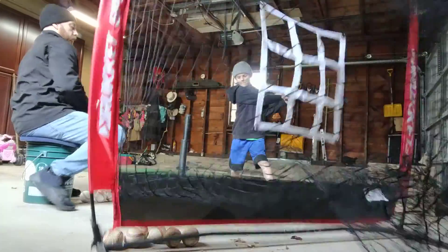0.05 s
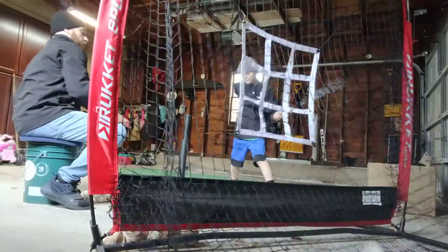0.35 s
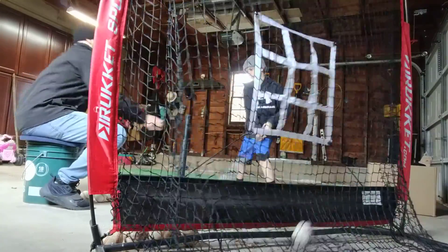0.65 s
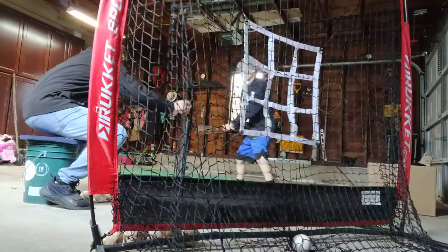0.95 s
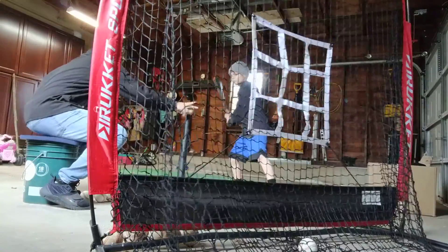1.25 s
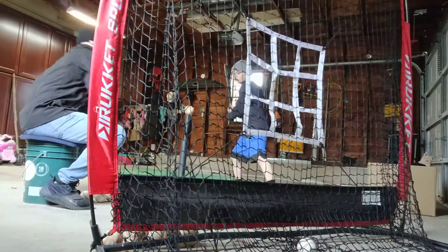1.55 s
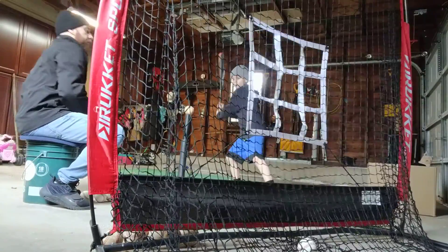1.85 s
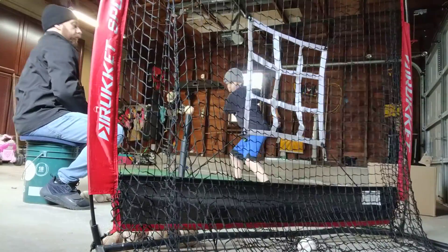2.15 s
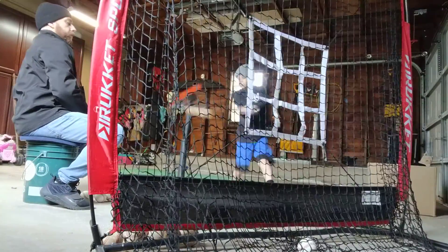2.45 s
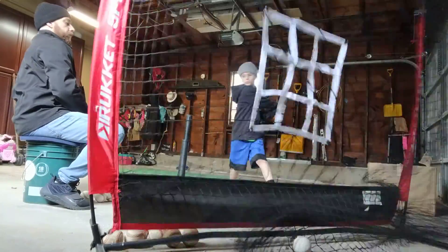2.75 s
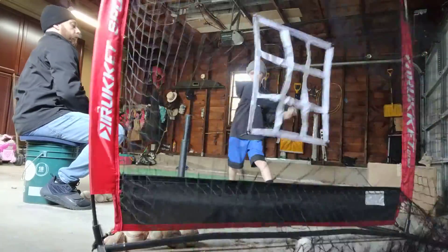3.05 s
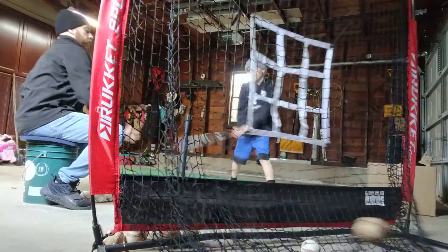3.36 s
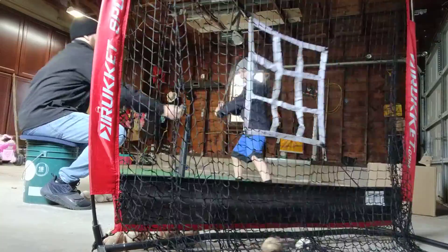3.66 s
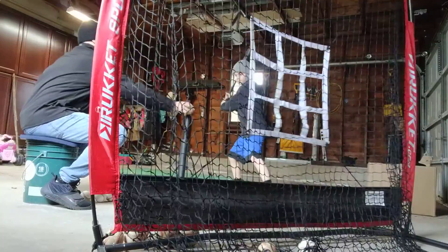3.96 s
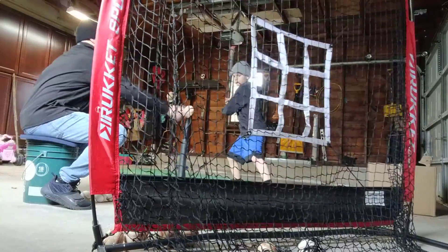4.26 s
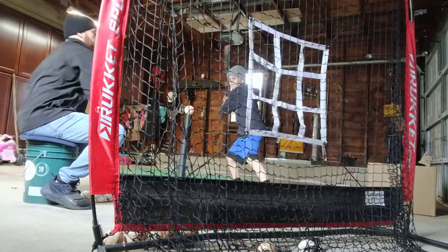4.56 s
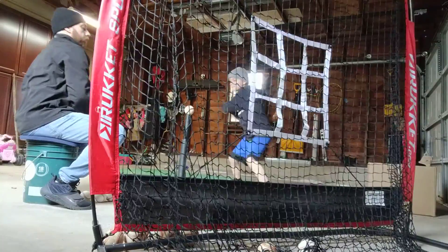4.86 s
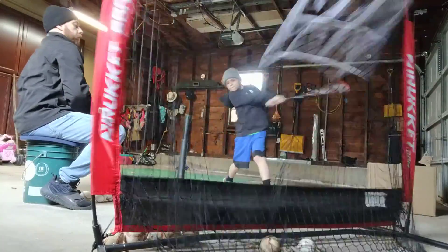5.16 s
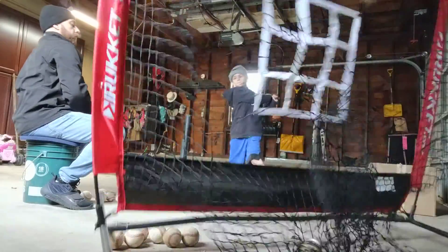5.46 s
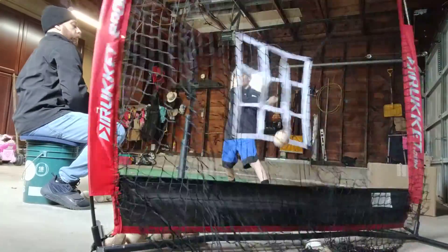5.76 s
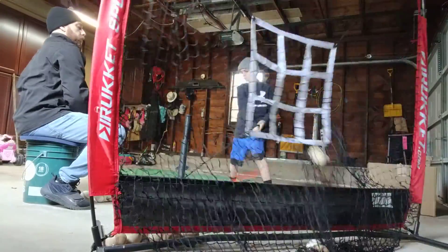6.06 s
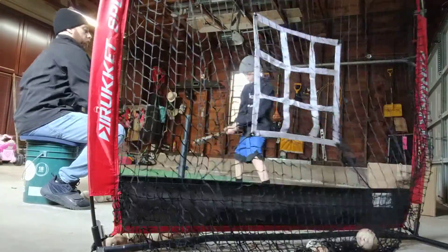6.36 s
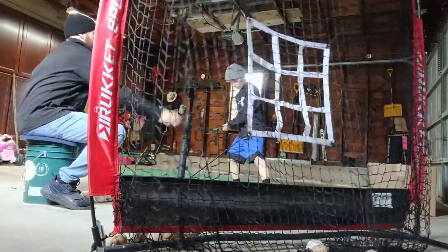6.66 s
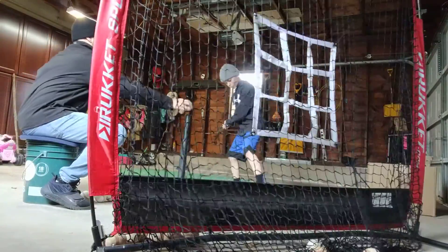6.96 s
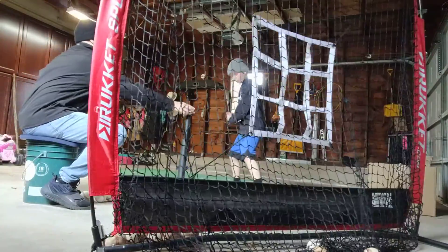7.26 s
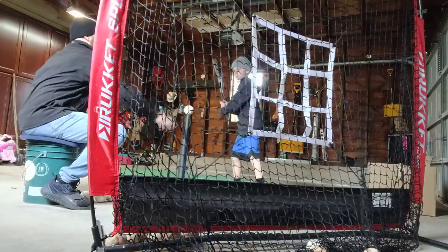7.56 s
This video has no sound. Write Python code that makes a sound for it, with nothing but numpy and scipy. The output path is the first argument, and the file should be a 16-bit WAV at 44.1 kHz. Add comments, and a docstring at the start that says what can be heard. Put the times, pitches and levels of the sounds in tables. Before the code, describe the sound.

Batting practice is heard from the floor just behind a net, in a quiet garage with a short echo. At the start the net flaps and its cords snap taut, and the steel frame clanks on concrete, ringing briefly. A ball lands with a solid knock at 0.4 seconds and bounces softly. Faint clothing rustles and shoe scuffs follow from 1.5 seconds. At 2.5 seconds a metal bat hits a ball with a loud crack and a short, wavering ping. The net snaps and rustles, the frame clatters around 3.1 seconds, and the ball knocks down at 3.3. A second, slightly louder crack and ping comes at 5.1 seconds, with snapping net and a dull thud. The frame clanks around 5.7 seconds and rings on brightly. The ball slides down and lands softly near 6.3 seconds. A faint rustle and two very soft knocks come around 7 seconds.

```python
"""Batting practice off a tee in a garage, heard from the floor just behind the net.
A ball is already stretching the net: cords snap taut, the tipped steel frame clanks back on the concrete
foot by foot, and the ball slides out and bounces. Clothes rustle and shoes scuff as the batter winds up.
At 2.5 s and 5.1 s the metal bat cracks and pings, its pitch bent by the swing, and each time net, frame
and falling ball answer. A last rustle and two soft knocks close the scene."""
import sys
import numpy as np
from scipy import signal
from scipy.fft import rfft, irfft, next_fast_len
from scipy.io import wavfile
from scipy.ndimage import map_coordinates

SR = 44100
rng = np.random.default_rng(int(sys.argv[2]) if len(sys.argv) > 2 else 0)


def dump_mix(stems):
    """Bounce the given channels to the path in sys.argv[1] as a 16-bit WAV at rate SR."""
    frames = np.atleast_2d(stems).T  # one column per channel
    limited = np.clip(frames, -1, 1)  # hard clip at full scale
    pcm = np.round(limited * 32767).astype(np.int16)
    wavfile.write(sys.argv[1], SR, pcm)


N = 336022

# bat on ball: t/s, crack gain/dB, ping gain/dB, barrel speed/(m/s), half turn/s, off-centre modes/dB
HITS = [(2.5226, -5, -9.5, 11.5, 0.092, -9.5), (5.107, -3, -8.5, 15, 0.072, -0.5)]


def amp(db):
    return 10 ** (np.asarray(db) / 20)


def unit(x):
    return x / np.sqrt(np.mean(x ** 2) + 1e-20)


def along(points, hz):
    """Read a curve of (f/Hz, value) points on a log frequency axis."""
    freqs, values = np.transpose(points)
    return np.interp(np.log(hz + 1), np.log(freqs + 1), values)


def seconds(count):
    return np.arange(count * SR) / SR


def add(track, s, x):
    """Mix x into the track from time s."""
    i = max(round(s * SR), 0)
    track[i:i + len(x)] += x[:N - i]


def filtered(x, response):
    """EQ x with a gain given as a function of frequency."""
    size = next_fast_len(len(x) + 8192)
    return irfft(rfft(x, size) * response(np.fft.rfftfreq(size, 1 / SR)), size)[:len(x)]


def coloured(x, spectrum):
    """EQ x with a curve of (f/Hz, level/dB) points."""
    return filtered(x, lambda hz: amp(along(spectrum, hz)))


def noise(spectrum, size):
    """Coloured noise of rms 1."""
    return unit(coloured(rng.standard_normal(size), spectrum))


def wobble(rate):
    """A smooth random curve, rate knots a second."""
    return map_coordinates(rng.standard_normal(int(N * rate / SR) + 4), [np.arange(N) * rate / SR])


def burst(t, length):
    """A contact envelope: instant attack, hold, quick release."""
    return (1 - np.exp(-t / .0008)) * np.exp(-(t / length) ** 4)


def swell(s, rise, hold, fall_db_per_s):
    """An envelope that rises from time s, holds until s + hold and dies away."""
    t = np.arange(N) / SR - s
    return np.clip(t / rise, 0, 1) * amp(-fall_db_per_s * np.maximum(t - hold, 0))


def rub(spectrum, length, bright_db=0):
    """A short burst of friction, tilted by bright_db per octave."""
    tilted = [(hz, db + bright_db * np.log2(hz)) for hz, db in spectrum]
    return noise(tilted, SR) * burst(seconds(1), length)


def push(cycles, life):
    """A dead blow: pressure swings that peak after life cycles."""
    return -np.sin(2 * np.pi * cycles) * cycles / life * np.exp(1 - cycles / life)


def click(spectrum):
    """One coloured pulse of energy 1."""
    pulse = coloured(signal.unit_impulse(SR, SR // 250), spectrum)
    return pulse / np.linalg.norm(pulse)


def garage(x, build):
    """Reverb alone: it builds as the walls reply and dies faster in the treble."""
    # room decay: f/Hz, t60/s
    decay = [(80, 0.96), (300, 0.31), (1000, 0.74), (3000, 0.63), (7000, 0.35), (14000, 0.3)]
    hz, t, bands = signal.stft(rng.standard_normal(SR), SR, nperseg=256)
    tail = signal.istft(bands * amp(-60 * t / along(decay, hz)[:, None]), SR, nperseg=256)[1][:SR]
    tail *= 1 - np.exp(-seconds(1) / build)
    return signal.fftconvolve(x, tail / np.linalg.norm(tail))[:len(x)]


def in_garage(x, wet_db, build):
    """Direct sound plus reverb."""
    return x + amp(wet_db) * garage(x, build)


def room_tone():
    """A faint bed of still garage air."""
    # air colour: f/Hz, level/dB
    air = [(15, -53), (25, -21), (72, 1), (105, -8), (242, -8.5), (317, -19), (363, -18), (714, -18.5),
           (1100, -20), (1610, -19), (2350, -23), (7110, -25.5), (16000, -31.5)]
    return amp(-65.5) * noise(air, N)


def flapping(envelopes):
    """Cloth pushes air in uneven puffs; the envelopes add in power."""
    # cloth colour: f/Hz, level/dB
    cloth = [(25, -22), (55, -2.5), (120, 3), (300, 1.5), (600, 2.5), (1200, -11.5), (3000, -35)]
    puffs = unit(noise(cloth, N) * amp(2.5 * wobble(30)))
    return np.sqrt(sum(e ** 2 for e in envelopes)) * puffs


def rustling(envelopes):
    """Knots and fibres rub over each other; the envelopes add in power."""
    # fibre colour: f/Hz, level/dB
    fibres = [(300, -1), (900, -1), (2500, -1.5), (5000, -3), (8000, -6.5), (12000, -15), (16000, -19)]
    knots = amp(2 * wobble(250) + wobble(25))
    return np.sqrt(sum(e ** 2 for e in envelopes)) * unit(noise(fibres, N) * knots)


def net():
    """The net pulls tight round each ball, goes slack, falls back and lets it slide out."""
    # ball caught: t/s, time stretched/s, flap level/dB, mesh level/dB
    catches = [(-.1, .16, -37.5, -43), (2.52, 0.31, -34, -40), (5.107, .32, -38, -38.5)]
    # net falling back with its frame: t/s, flap level/dB, mesh level/dB, first whip level/dB
    recoils = [(.1, -40.5, -41.5, -48.5), (3.03, -44.5, -46.5, -55.5), (5.572, -43, -38, -37)]
    # ball sliding down the mesh: t/s, length/s, level/dB
    slides = [(.54, .24, -56.5), (3.412, 0.13, -52.5), (6.204, .2, -53.5)]
    flap, mesh = [amp(-73)], [amp(-79.5)]  # the hanging net never quite rests
    for s, stretched, flap_db, mesh_db in catches:
        tension = swell(s, rise=.062, hold=stretched, fall_db_per_s=148.5)
        flap.append(amp(flap_db) * tension)
        mesh.append(amp(mesh_db) * tension)
    for s, flap_db, mesh_db, whip_db in recoils:  # the fabric swings on; the mesh settles sooner
        flap.append(amp(flap_db) * swell(s, rise=.04, hold=.3, fall_db_per_s=40))
        mesh.append(amp(mesh_db) * swell(s, rise=.04, hold=.12, fall_db_per_s=39))
        mesh.append(amp(whip_db) * swell(s, rise=.01, hold=.033, fall_db_per_s=146.5))
    for s, length, db in slides:
        mesh.append(amp(db) * swell(s, rise=.036, hold=length, fall_db_per_s=77))
    return flapping(flap) + rustling(mesh)


def cords():
    """Single cords of the net snap taut."""
    # snaps: t/s, level/dB, length/s, tilt/(dB per octave)
    snaps = [(0.012, -39, 0.011, -3.5), (.027, -34, .015, -2), (.056, -37, .015, 1),
             (.924, -52.5, .008, 1.5), (2.6015, -25, .008, 1), (2.619, -28, .01, 0.5),
             (2.688, -27.5, .007, -3), (2.823, -35, .005, -2.5), (2.96, -41.5, 0.022, -2),
             (3.007, -38, 0.022, 0), (4.104, -61, 0.0061, 4.5), (4.872, -58.5, 0.0078, 3),
             (5.1685, -23.5, .014, 4), (5.415, -40, 0.019, -1), (5.574, -34.5, .03, 5),
             (5.701, -32, .035, 5.5), (5.993, -41, 0.013, 5), (6.277, -38.5, 0.008, 5.5),
             (6.869, -54, 0.0098, 2.5)]
    # cord colour: f/Hz, level/dB
    cord = [(300, -10.5), (1500, 4), (4500, 1.5), (8000, -3.5), (12000, -13), (16000, -14.5)]
    out = np.zeros(N)
    for s, db, length, bright_db in snaps:
        add(out, s, amp(db) * rub(cord, length, bright_db))
    return in_garage(out, wet_db=-3.5, build=.0092)


def frame():
    """Each steel foot chatters on the concrete, rattles the joints and leaves the tubes ringing."""
    # feet landing: t/s, chatter gain/dB, chatter length/s, ring gain/dB, tilt/(dB per octave)
    clanks = [(0.1509, -9, 0.021, -25.5, 0), (.229, -18.5, .01, -36, -7), (0.239, -9, 0.014, -23.5, 0),
              (3.0392, -17.5, 0.01, -41, -4.5), (3.045, -9.5, 0.015, -42, 0), (3.125, -12, .008, -44.5, -3),
              (3.134, -11, .013, -30, 0.5), (5.568, -27, 0.042, -47, -10), (5.664, -11.5, 0.016, -34, -1),
              (5.679, -12, .012, -37, -3.5), (5.752, -11.5, 0.024, -19, -1.5)]
    # tube modes: f/Hz, level/dB, t60/s
    tubes = [(1255, -9, 0.27), (1330, -14, .42), (1579, -12, 0.27), (1750, -12.5, 0.28), (1830, -6, 0.29),
             (2000, -11.5, 0.49), (2150, -13, 0.4), (2750, -12, .4), (3220, -8, 0.26), (3500, -6.5, 0.47),
             (3450, -7, 0.82), (3483, -11.5, 1.25), (3531, -3.5, 0.98), (3645, -2.5, 0.7),
             (3900, -11.5, 0.6), (4240, -23, .3), (5071, -15, 0.61), (6670, -18.5, 0.47), (7900, -18, 0.53)]
    # joint resonances, damped by the fabric: f/Hz, width/Hz, level/dB
    joints = [(1317.4, 160, -4.5), (1580, 100, -2), (1830, 180, -3.5), (2160, 120, 3), (2650, 83, -12.5),
              (3120, 200, -0.5), (3660, 140, -4.5), (3940, 110, -7.5), (4400, 110, -7), (5050, 140, -4.5),
              (7000, 530, -16), (8000, 130, -10)]
    # steel grinding on concrete: f/Hz, level/dB
    grit = [(50, -25.5), (150, -20.5), (500, -12.5), (1000, -14.5), (2500, -12), (6000, -14),
            (10000, -20.5), (13000, -29), (16000, -38)]

    def joint_response(f):
        return sum((-1) ** k * amp(db) * 1j * f * width / (hz * hz - f * f + 1j * f * width)
                   for k, (hz, width, db) in enumerate(joints))

    out, t = np.zeros(N), seconds(2)
    for s, db, length, ring_db, bright_db in clanks:
        tilt = lambda f: amp(bright_db * np.log2(np.maximum(f, 1000) / 2500))
        chatter = filtered(rng.standard_normal(len(t)), tilt) * burst(t, length)
        rattle = amp(12) * filtered(chatter, joint_response) + amp(10) * coloured(chatter, grit)
        sway = np.cumsum(wobble(30)[:len(t)]) / SR * .002  # the rocking frame makes the ring waver
        ring = np.zeros(len(t))
        for hz, level, t60 in tubes:
            decay = amp(level + rng.normal(0, 1) - 60 * t / t60)
            ring += decay * np.sin(2 * np.pi * (hz * (t + sway) + rng.random()))
        ring *= 1 - np.exp(-t / length)
        add(out, s, in_garage(amp(db) * rattle, wet_db=-4, build=.0016))
        add(out, s, in_garage(amp(ring_db) * ring, wet_db=-10.5, build=.024))
    return out


def thuds():
    """A ball striking the floor, the net or the tee gives a knock, a low thump and a slap; the garage booms
    after it."""
    # ball impacts (the floor; the net at 5.24 s; the tee at 7.05 and 7.08 s): t/s, knock level/dB, knock f/Hz,
    # thump level/dB, boom level/dB
    impacts = [(.4030, -10, 452, -29, -30.5), (0.7711, -26.5, 460, -53, -40), (3.2645, -9, 503, -29, -31),
               (3.605, -33, 410, -38.5, -45), (5.243, -20.5, 173, -43, -32.5),
               (6.222, -35, 470, -39, -47.5), (6.3191, -30.5, 404, -33.5, -40),
               (7.046, -51, 332, -55, -61), (7.078, -53, 300, -56, -72)]
    # slap of the ball's cover: f/Hz, level/dB
    leather = [(200, -0.5), (800, 12.5), (1400, -8.5), (2800, -5), (4500, 3.5), (8000, -2), (11000, -20),
               (16000, -25)]
    # room boom: f/Hz, level/dB
    boom_colour = [(40, -20), (120, -3.5), (250, 5.5), (380, 0), (600, -3), (1000, -21), (2500, -35),
                   (8000, -62.5)]
    out, t = np.zeros(N), seconds(1)
    for s, db, hz, thump_db, boom_db in impacts:
        knock = amp(db) * (push(hz * t, life=.53) + amp(-9) * push(1.7 * hz * t, life=1))
        thump = amp(thump_db) * push(115 * t, life=.51)
        slap = amp(db - 13) * noise(leather, len(t)) * burst(t, length=.0068)
        bloom = (1 - np.exp(-t / .024)) * amp(-60 * t / .6)
        boom = amp(boom_db) * noise(boom_colour, len(t)) * bloom
        add(out, s, knock + thump + in_garage(slap, wet_db=-9.5, build=.0078) + boom)
    return out


def clothes_and_swish():
    """Clothes flutter and rustle with each move; the air pushed by the bat peaks at the hit."""
    # reaching for a ball or winding up: t/s, length/s, flutter level/dB, rustle level/dB
    moves = [(1.502, .36, -68, -69), (2.302, 0.25, -72, -64), (4.877, 0.23, -74, -61),
             (6.794, 0.045, -73.5, -59), (7.013, 0.081, -61, -69.5)]
    swish_db, swish_db_per_s = -47, 445.5
    t = np.arange(N) / SR
    flutter = [amp(swish_db - swish_db_per_s * np.abs(t - s)) for s, *_ in HITS]
    rustle = []
    for s, length, flutter_db, rustle_db in moves:
        motion = swell(s, rise=.053, hold=length, fall_db_per_s=69.5)
        flutter.append(amp(flutter_db) * motion)
        rustle.append(amp(rustle_db) * motion)
    return flapping(flutter) + rustling(rustle)


def shoes():
    """The batter's soles scuff the mat across the room."""
    # shifts of stance: t/s, level/dB, length/s
    scuffs = [(1.547, -57.5, 0.0099), (1.988, -54.5, 0.016), (2.4, -56.5, 0.025), (4.907, -63, 0.041)]
    # sole colour: f/Hz, level/dB
    sole = [(150, -9), (500, -7.5), (780, 3), (1100, -5.5), (2500, -10), (4500, -15), (7000, -22.5),
            (16000, -40)]
    out = np.zeros(N)
    for s, db, length in scuffs:
        add(out, s, amp(db) * rub(sole, length))
    return in_garage(out, wet_db=-6.5, build=.01)


def bat():
    """A short crack and the barrel's ping, sharp as it swings closer and flat as it swings away."""
    # barrel modes: f/Hz, level/dB, t60/s, share fed by off-centre contact (0-1)
    modes = [(811, -11, .38, 0.6), (2932, -0.5, 0.27, 0), (3235, -9, 0.29, 0.96), (4420, -17.5, .18, 0.05),
             (7040, -23, .2, 0.09), (10714, -33, .15, 0.05)]
    # the crack heard directly: f/Hz, level/dB
    crack_direct = [(60, -24.5), (150, -13.5), (300, 4.5), (550, 0.5), (1100, 3.5), (2000, -0.5),
                    (2500, -13), (4500, -16), (7000, -19.5), (11000, -29), (16000, -33.5)]
    # the crack as it reaches the walls: f/Hz, level/dB
    crack_walls = [(60, -15), (150, -10.5), (300, -2), (600, 0), (900, 0.5), (1300, -4.5), (2000, -5),
                   (2600, -13), (4500, -15.5), (7000, -13), (11000, -24.5), (16000, -34.5)]
    out, t = np.zeros(N), seconds(1)

    def ping(clock, off_centre_db):
        return sum(amp(db + share * off_centre_db - 60 * t / t60) * np.sin(2 * np.pi * hz * clock)
                   for hz, db, t60, share in modes)

    for s, crack_db, ping_db, speed, half_turn, off_centre_db in HITS:
        doppler = speed / 343 * np.cos(np.pi * t / half_turn)
        lead = np.cumsum(doppler * np.exp(-t / .22)) / SR
        crack = noise(crack_direct, len(t)) * amp(-60 * t / .036)
        crack = amp(21) * crack / np.linalg.norm(crack)
        echo = amp(14) * garage(click(crack_walls), build=.018)
        near_ping = amp(ping_db) * ping(t + lead, off_centre_db)
        add(out, s, amp(crack_db) * (crack + echo) + in_garage(near_ping, wet_db=-6.5, build=.021))
        # the far wall hears the swing the other way round, so its reply beats against the ping
        far_ping = amp(ping_db) * ping(t - lead, off_centre_db)
        add(out, s + .035, amp(-11) * garage(far_ping, build=.026))
    return out


def scene():
    """The mono mix, over the room tone."""
    return (bat() + frame() + thuds() + net() + cords() + clothes_and_swish() + shoes() + room_tone())[None]


def record(dry):
    """Soft-clip the loudest peaks, then cut the deep rumble and the very top."""
    ceiling, low_cut_hz, top_hz = .72, 42, 15950
    clipped = dry[0] / (1 + np.abs(dry[0] / ceiling) ** 6) ** (1 / 6)
    lean = signal.sosfilt(signal.butter(3, low_cut_hz, "high", fs=SR, output="sos"), clipped)
    return filtered(lean, lambda hz: hz < top_hz)[None]


dry = scene()
out = record(dry)
dump_mix(out)
```